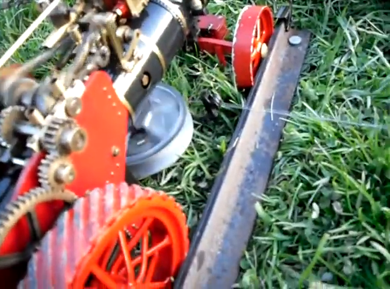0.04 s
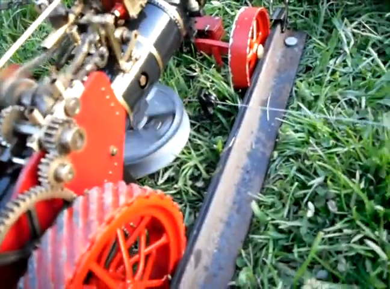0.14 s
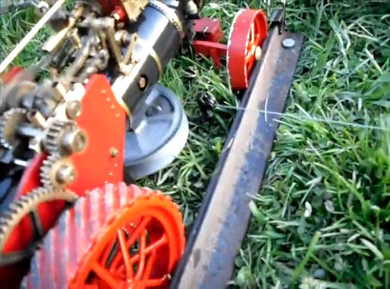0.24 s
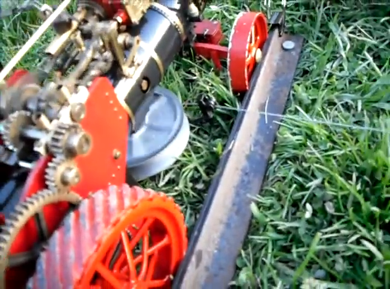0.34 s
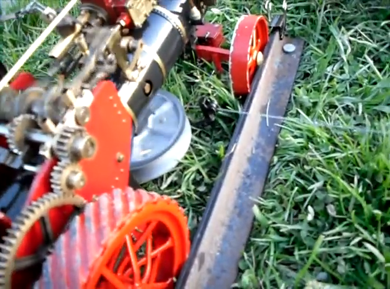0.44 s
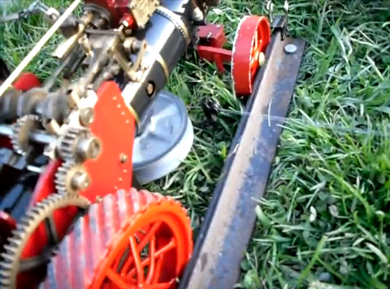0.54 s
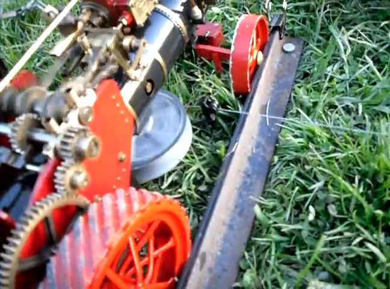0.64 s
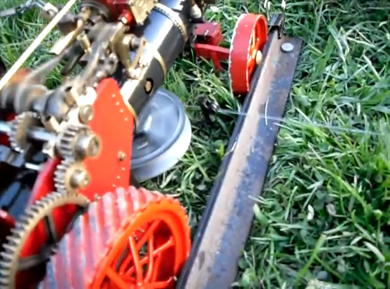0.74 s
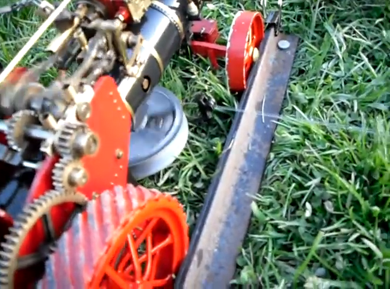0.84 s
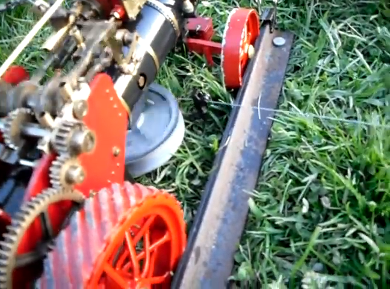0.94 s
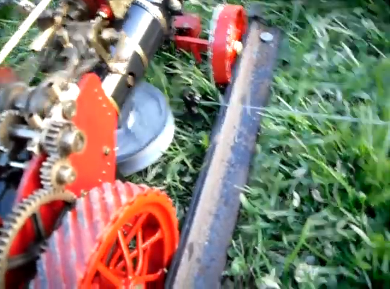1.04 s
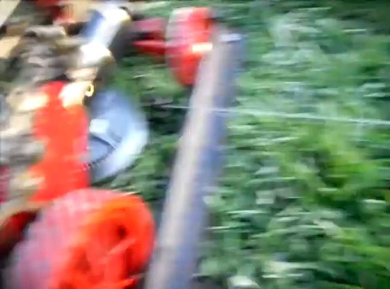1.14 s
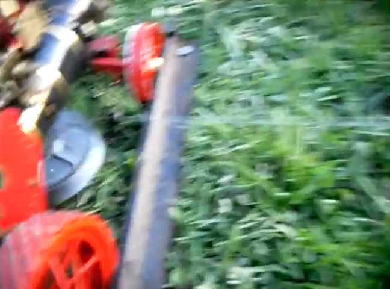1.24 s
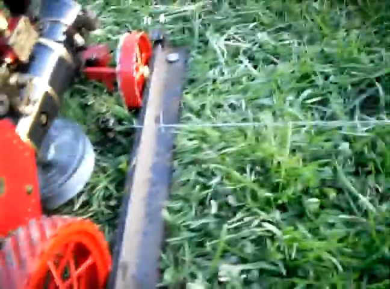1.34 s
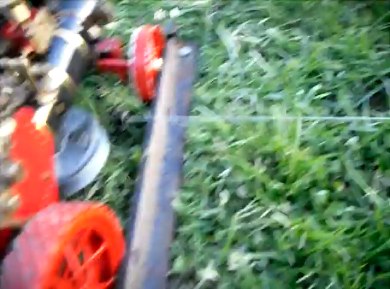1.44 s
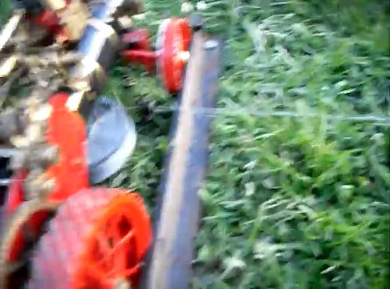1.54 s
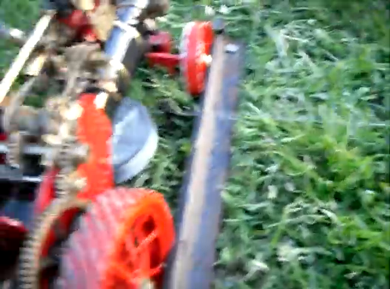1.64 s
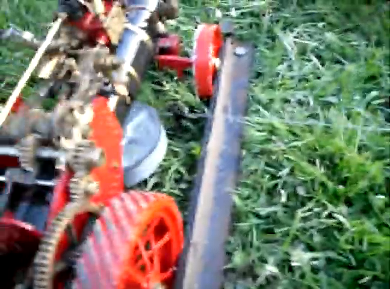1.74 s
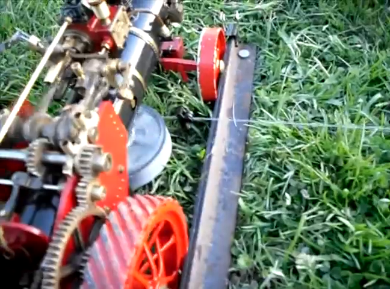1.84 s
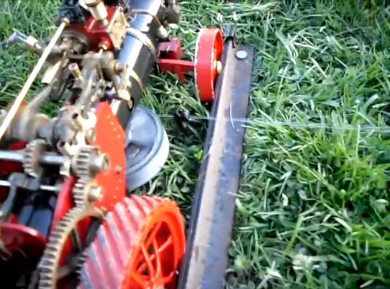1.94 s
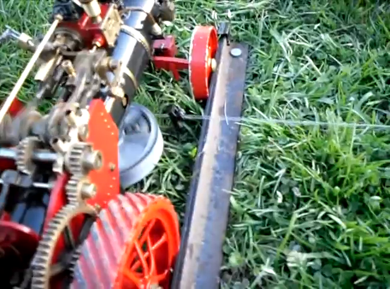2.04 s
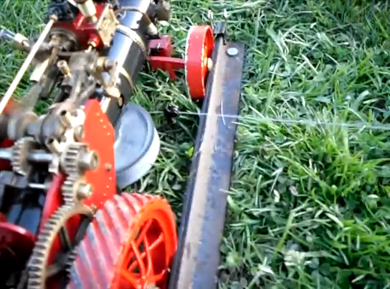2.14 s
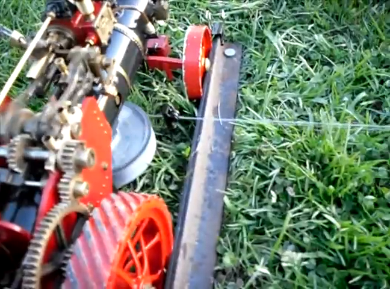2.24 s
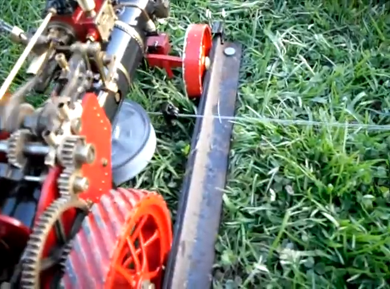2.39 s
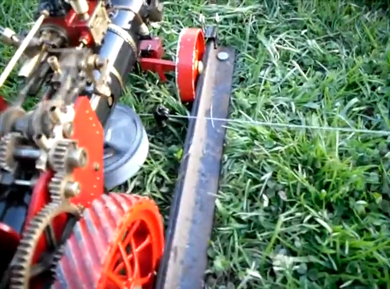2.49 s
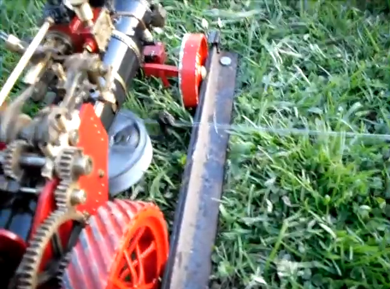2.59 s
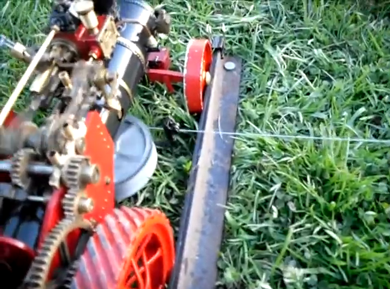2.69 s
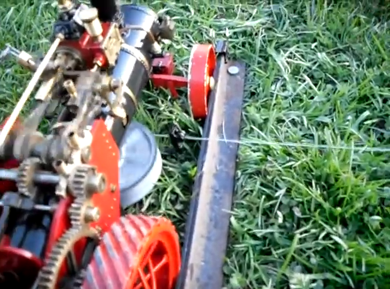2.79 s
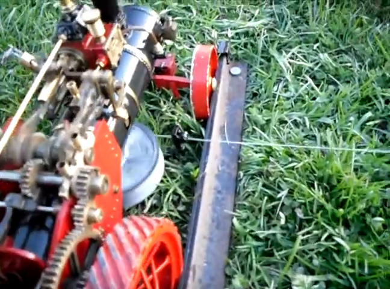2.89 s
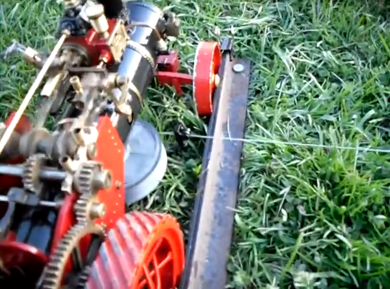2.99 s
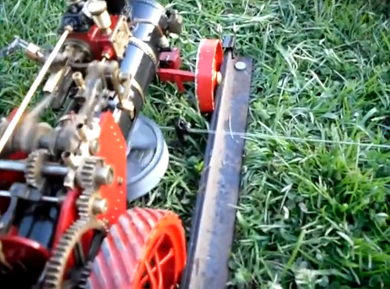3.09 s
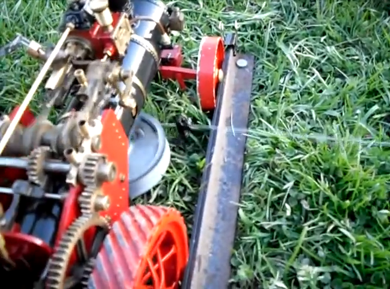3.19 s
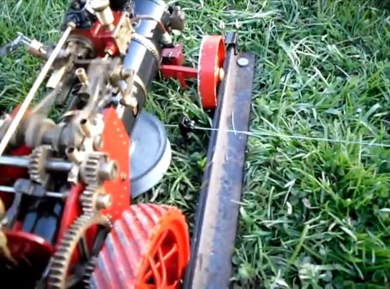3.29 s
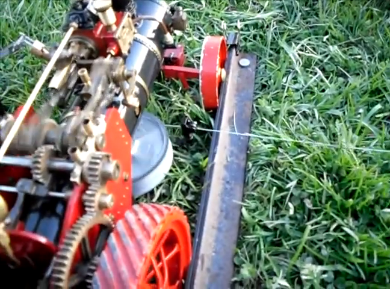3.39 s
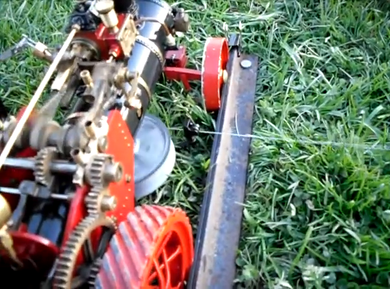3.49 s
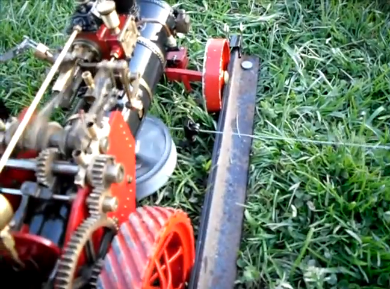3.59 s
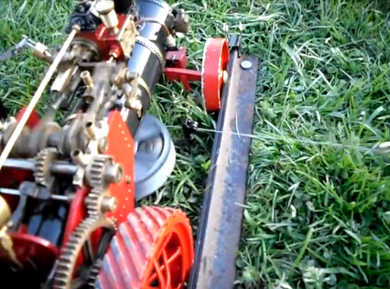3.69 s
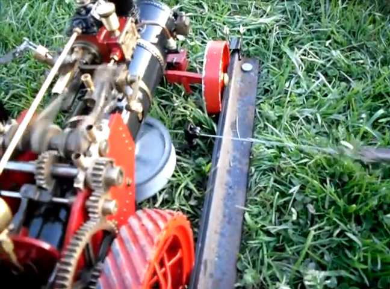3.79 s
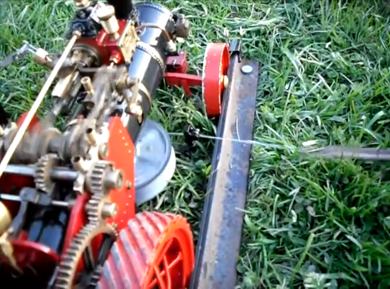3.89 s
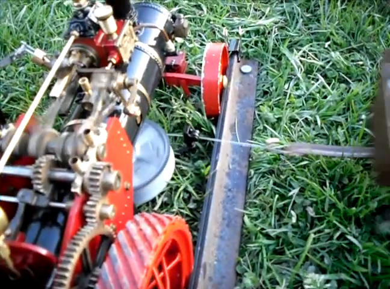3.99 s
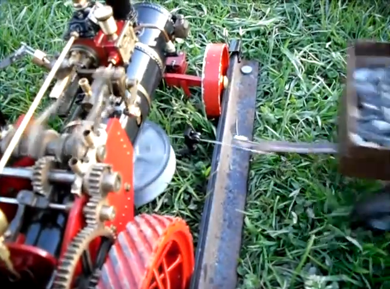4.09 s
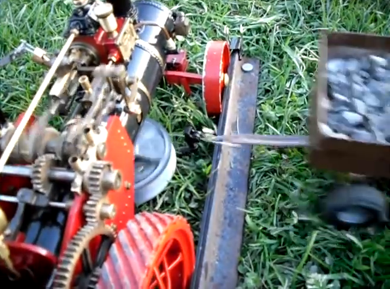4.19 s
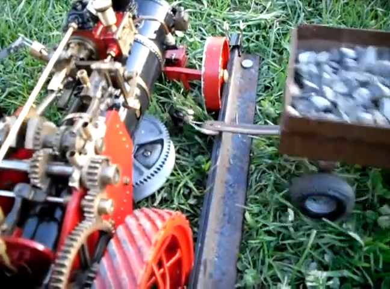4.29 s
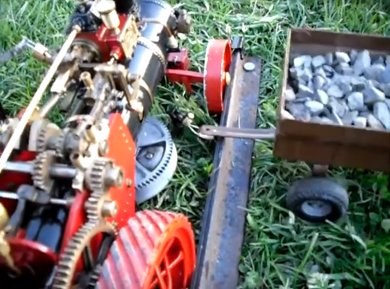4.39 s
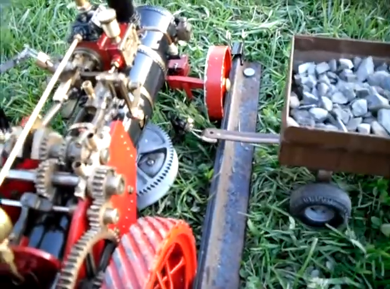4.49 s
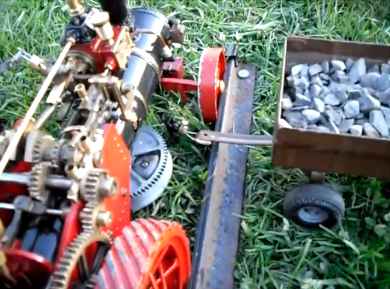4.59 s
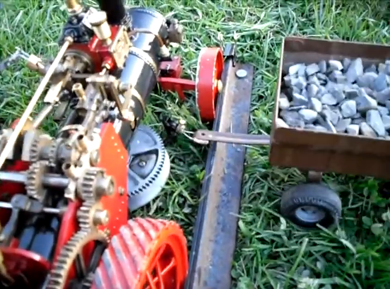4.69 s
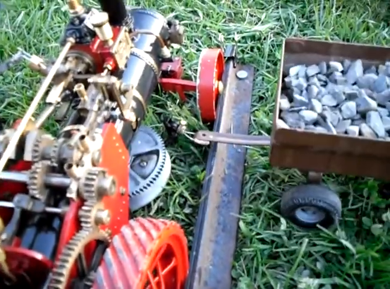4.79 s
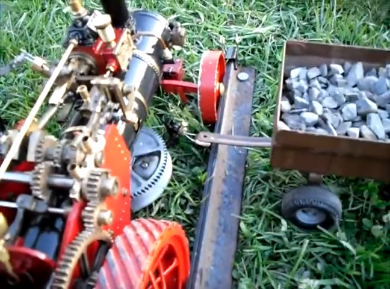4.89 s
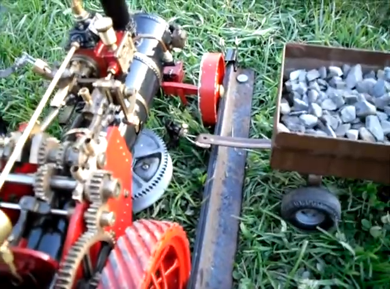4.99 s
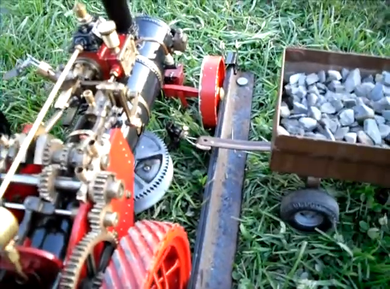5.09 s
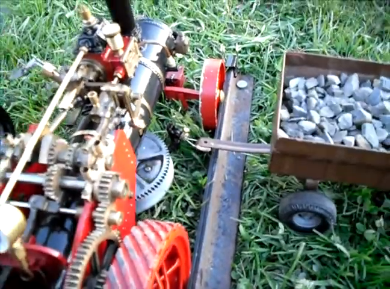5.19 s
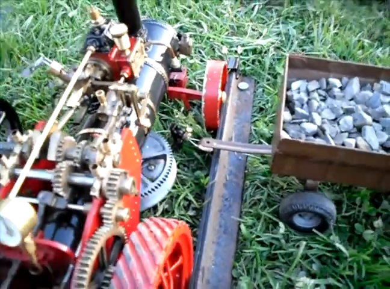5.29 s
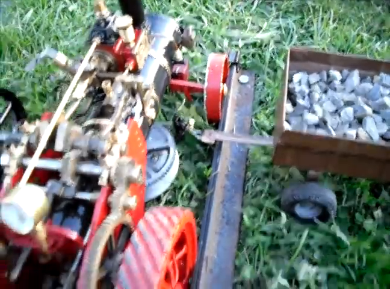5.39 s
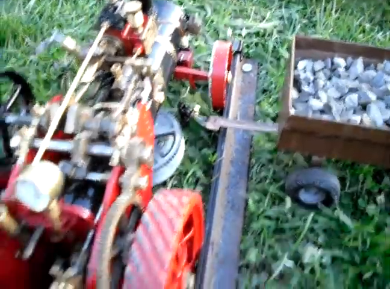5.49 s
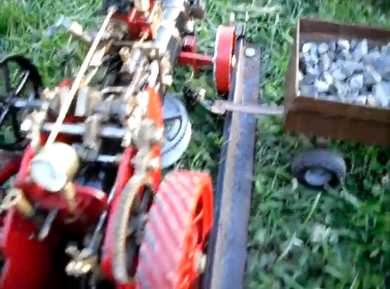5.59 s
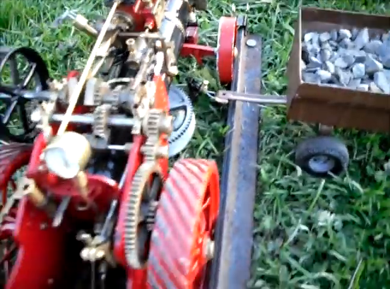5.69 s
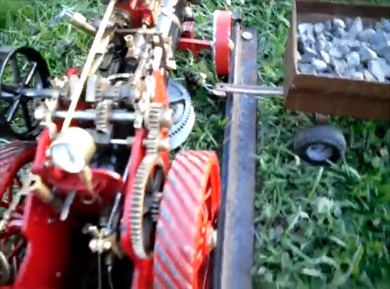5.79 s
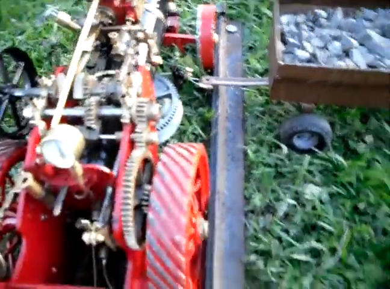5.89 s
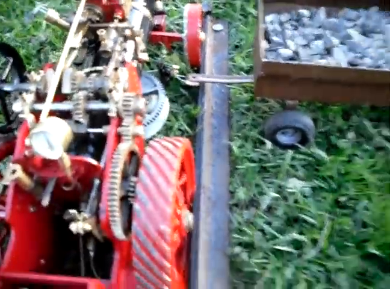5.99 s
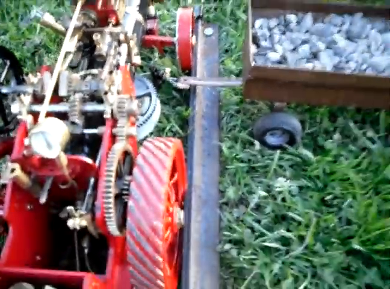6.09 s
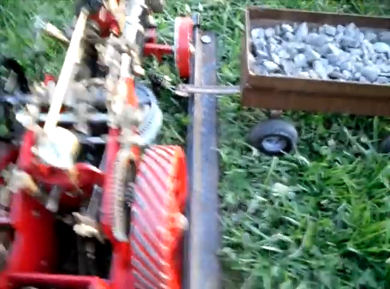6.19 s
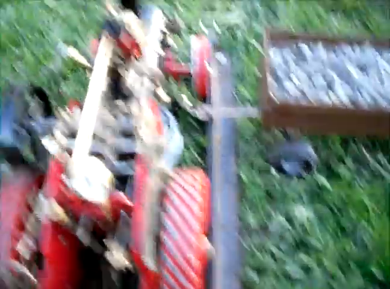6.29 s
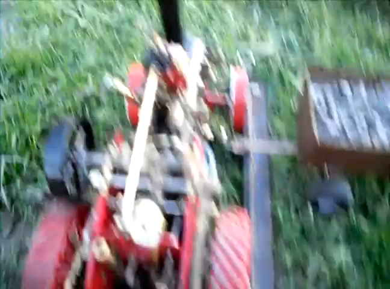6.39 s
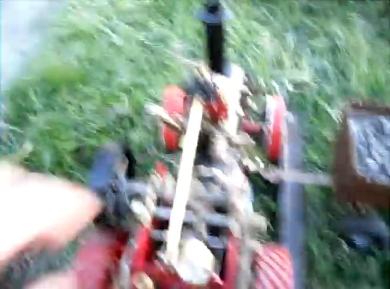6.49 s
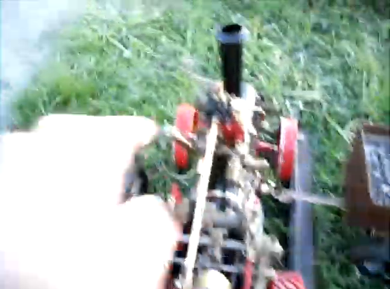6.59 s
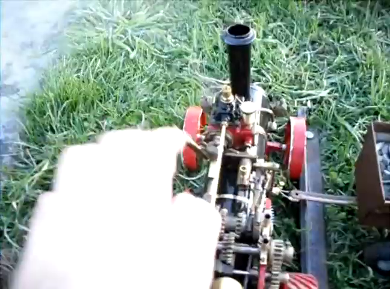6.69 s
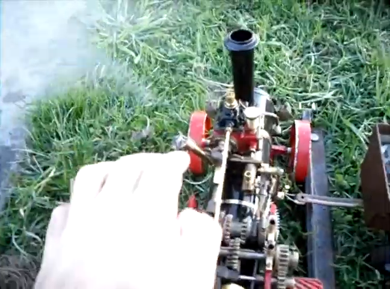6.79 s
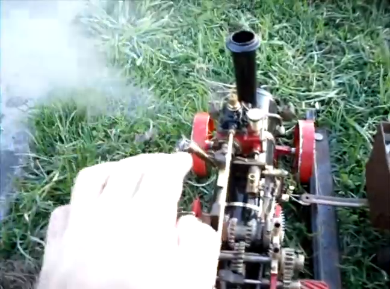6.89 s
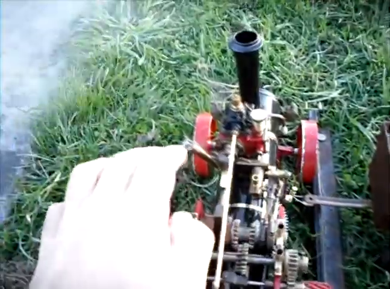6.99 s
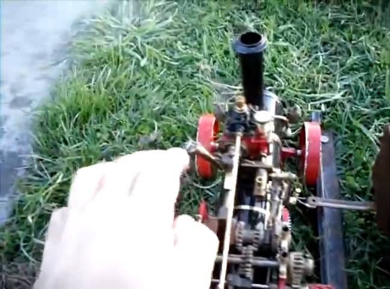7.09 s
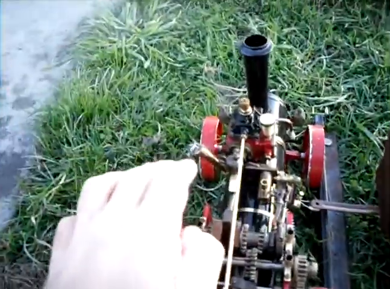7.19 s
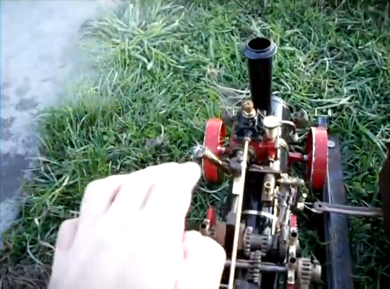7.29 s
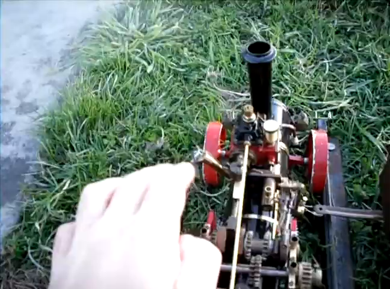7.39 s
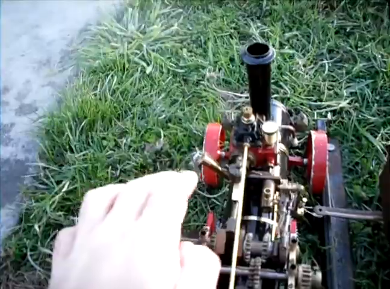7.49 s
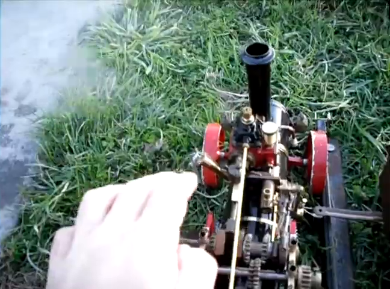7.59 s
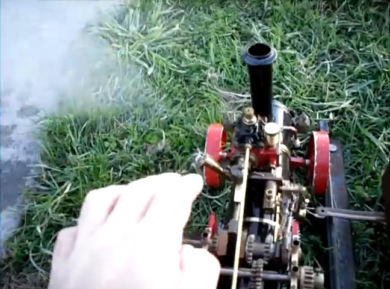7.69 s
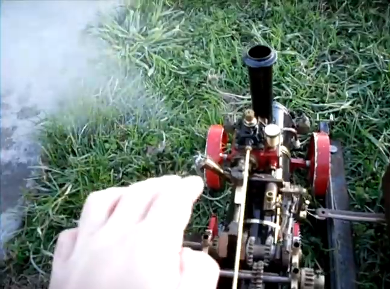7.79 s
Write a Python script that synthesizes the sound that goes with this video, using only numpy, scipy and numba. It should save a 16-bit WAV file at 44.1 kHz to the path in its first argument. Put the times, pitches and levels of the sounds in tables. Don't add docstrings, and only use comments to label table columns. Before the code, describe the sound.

Outdoors on grass, a cheap close camera microphone gives a gritty, band-limited mono sound with faint hiss, distant traffic and light breeze. From 0 to 4.1 seconds a small steam engine runs fast, around eleven to fourteen strokes a second: short hollow chuffs, two crisp valve-gear clacks per stroke and continuous tinny gear rattle. A hard watery pop bursts at 1.0. The engine stalls at about 4.1 amid a few sharp ticks; leftover steam sighs softly and a hitch jingles around 4.6. Sparse hot-metal ticks and soft low handling bumps continue until 6.4. At 6.65 a very loud, shrill whistle near 4.5 kilohertz sputters for about 0.15 seconds. A shorter, weaker, mostly hissing pull comes at 7.0 to 7.2. At 7.3 steam hisses again, then from 7.5 it shrieks in broken, spitting surges, steadying into a clipped scream from 7.7 almost to the end.

```python
import sys
import numpy as np
from scipy import signal
from scipy.io import wavfile
from scipy.ndimage import uniform_filter1d
from numba import njit

SR = 44100
rng = np.random.default_rng(int(sys.argv[2]) if len(sys.argv) > 2 else 0)


def unload_wav(signal):
    wavfile.write(
        sys.argv[1],
        SR,
        np.round(np.clip(np.atleast_2d(signal).T, -1, 1) * 32767).astype(np.int16),
    )


def gain_from_db(level_db):
    decades = np.asarray(level_db, float) / 20
    return 10 ** decades


N = 346185

# frequency in Hz, density in dB per Hz.
LAWN_SPECTRUM = [(20, -5), (70, -5), (178, -1), (550, -10), (650, -9.5), (1010, -17), (1960, -15),
                 (2720, -17.5), (3300, -18.5), (3560, -8.5), (3800, -13), (4400, -12), (5150, -12),
                 (5600, -18.5)]
LAWN_DB = -48.5
# centre in seconds, level in dB.
GUSTS = [(.2, -51.5), (.41, -48), (.98, -52), (1.47, -53.5), (2.1, -53), (4.15, -52), (5.46, -56.5),
         (5.74, -51.5), (5.97, -59), (7.27, -51)]
BREEZE_DB, GUST_S, JET_WIND_DB = -60.5, .06, -23
# start in seconds, end in seconds, first pitch in Hz,
# last pitch in Hz, level in dB.
MOAN = (.35, 0.35, 167, 124.5, -42.5)
# start in seconds, peak in dB, thump in Hz, length in seconds.
HAND_THUMPS = [(5.46, -43, 60, .05), (5.49, -47, 49.8, .04), (5.723, -45, 128.4, .07),
               (5.964, -44, 50, .05), (7.249, -36.5, 50.4, .05), (7.287, -37.5, 60.17, .05),
               (7.364, -45.5, 45.44, .06)]

# time in seconds, level in dB, third chimney mode in dB.
SIGH_LEVELS = [(0, -62.5, -3.5), (4.1, -56, -2.5), (4.3, -56, -7.5), (4.5, -55.5, -6.5),
               (4.7, -59.5, -10.5), (5.1, -63, -15.5), (5.5, -75, -13.5)]
# time in seconds, peak in dB, upper ring in Hz, lower ring in dB, lower ring in Hz.
METAL_TICKS = [(4.079, -25, 4300, -8, 2950), (4.124, -23, 5000, -8, 2540), (4.1668, -23.5, 4250, -4, 2980),
               (4.4693, -24.5, 4260, -12.5, 1584), (4.926, -24, 4190, -7, 2993),
               (5.051, -34.5, 3622, -7.5, 2950), (5.416, -20, 4360, -8, 2690),
               (5.7338, -34, 4000, -7, 1475), (5.8139, -25.5, 3530, -7.5, 2510),
               (5.9504, -22.5, 4260, -6.5, 2990), (6.0053, -37, 3610, -2, 2458),
               (6.111, -35, 3530, -7.5, 2034), (6.3852, -29.5, 4490, -3.5, 2450)]
# frequency in Hz, level in dB, 60 dB decay in seconds.
HITCH_MODES = [(661.3, -6.5, 0.041), (1630, -8.5, .015), (2610, 0, 0.014), (3200, -8, .006),
               (3650, -2, 0.018), (4260, -4, 0.013), (5000, -4.5, .01)]
# time in seconds, peak in dB.
HITCH_JINGLES = [(4.5776, -32.5), (4.5907, -27.5), (4.5964, -27), (4.618, -26), (4.6308, -24.5),
                 (4.6444, -34), (4.7651, -40.5)]

# time in seconds, exhaust strokes done.
CRANK = [(.022, 0), (.208, 2), (.558, 6), (1.031, 12), (1.315, 16), (1.466, 18), (2.052, 26), (2.187, 28),
         (2.403, 31), (2.755, 36), (2.891, 38), (3.035, 40), (3.246, 43), (3.382, 45), (3.607, 48),
         (3.886, 52), (4.044, 54), (4.143, 55)]
# frequency in Hz, width in Hz, level in dB.
FRAME_MODES = [(650.5, 200, -8.5), (1150, 600, -12), (1713, 200, -9), (2093, 100, -6.5), (2450, 280, -5),
               (2953, 440, -8.5), (3703, 300, -7.5), (4150, 400, -4.5), (5000, 720, -11)]
# time in seconds, level in dB.
RATTLE_LEVELS = [(0, -40.5), (.9, -40), (1.1, -38.5), (1.4, -40.5), (2.2, -40), (3.9, -40), (4.0, -40.5),
                 (4.14, -47.5), (4.25, -59), (4.45, -69.5), (4.7, -90.5)]
SLACK_TURN, SLACK_DB = 0.94, -4.5
# frequency in Hz, level in dB, 60 dB decay in seconds.
CHIMNEY_MODES = [(641.5, 0.5, 0.042), (168.5, -10, 0.021), (336, -7.5, 0.011), (486, -9.5, 0.0099),
                 (1805, -20, .02)]
# frequency in Hz, level in dB, 60 dB decay in seconds.
FIRST_CLACK = [(2486, -5, 0.0082), (3140, -8.5, 0.0045), (3700, -4, .007), (4250, 0.5, .009),
               (5000, -2.5, 0.0066)]
# frequency in Hz, level in dB, 60 dB decay in seconds.
SECOND_CLACK = [(1770, -8.5, 0.016), (2504, -6, 0.011), (3173, -10, 0.0063), (4150, -3, .008),
                (4824, 1.5, .007), (5230, -3, .006)]
# frequency in Hz, level in dB, 60 dB decay in seconds.
WATER_POP_MODES = [(330, -14, .012), (660, -7, .032), (1150, -1, .008), (1400, -1, .008), (1700, -2, .011),
                   (2500, 0, .013), (3100, -3, .007), (4300, -2.5, .009)]
# time in seconds, peak in dB.
WATER_POPS = [
    (.9862, -3.4),
    (1.0166, -16.5),
    (2.141, -23),
]
FIRST_TURN, SECOND_TURN, SETTLE_TURN, TURN_JITTER = .4, .595, .645, .008
CHUFF_DB, FIRST_DB, SECOND_DB, SETTLE_DB = 15.5, 17.5, 15.5, 11
CHUFF_SPREAD_DB, CLACK_SPREAD_DB = 1, 1.1
LOOSE_S, LOOSE_SPAN_S, LOOSE_DB = 1.3, .4, 1.5

# frequency in Hz, density in dB per Hz.
JET_SPECTRUM = [(880, -48), (1500, -19), (2210, -20.5), (2270, -18.5), (2710, -15), (3600, 1), (3930, -4),
                (4750, -1.5), (5500, -16), (7150, -46.5), (12100, -120)]
# start in seconds, length in ms, peak in dB.
SURGES = [(6.6452, 4.6, -3), (6.654, 4, -9), (6.687, 4.76, -13), (6.701, 6, -7.5), (6.71, 5.15, -8),
          (6.72, 6, -9), (6.736, 4.43, -10), (6.741, 18.8, -1.5), (6.759, 9.9, -11.5), (7.126, 6.9, -16),
          (7.134, 13.9, -8), (7.149, 4, -10), (7.159, 8.1, -10), (7.505, 11.86, -3), (7.524, 5.04, -4),
          (7.532, 5.93, -4), (7.54, 3.9, -1), (7.554, 3.85, -7), (7.562, 9, -9), (7.576, 3, -4),
          (7.585, 16, -2.5), (7.617, 5.5, -3), (7.628, 4, -6), (7.643, 6, -2.5), (7.652, 8.3, -2.5),
          (7.664, 27, -3), (7.694, 7.64, -2), (7.703, 3.7, -7.5), (7.711, 126, 1.34), (7.837, 13, -4)]
# time in seconds, peak in dB.
SPITS = [
    (6.719, -12),
    (7.535, 0),
    (7.612, -7),
    (7.72, 1),
]
OPEN_S, CLOSE_S, SHUT_DB = .009, .028, -95
# time in seconds, pitch in Hz, breathy tone in dB, jet hiss in dB.
FIRST_PULL = [(6.639, 4207, -39.5, -46), (6.645, 4280, -21, -31), (6.665, 4627, -19, -28),
              (6.74, 4535, -17.5, -27.5), (6.76, 4218, -21, -31), (6.776, 4067, -29.5, -35),
              (6.8, 4000, -59, -56)]
# time in seconds, pitch in Hz, breathy tone in dB, jet hiss in dB.
SECOND_PULL = [(7.02, 3998, -68.5, -53), (7.028, 4000, -59.5, -31.5), (7.105, 3800, -52.5, -31),
               (7.125, 4003, -28, -29.5), (7.145, 4178, -20, -31.5), (7.17, 4150, -26, -31.5),
               (7.185, 4150, -42, -30.5), (7.205, 4150, -63, -58.5)]
# time in seconds, pitch in Hz, breathy tone in dB, jet hiss in dB.
LONG_HISS = [(7.314, 3700, -69.5, -49), (7.322, 3700, -51.5, -34), (7.345, 3700, -43.5, -28.5),
             (7.4, 3700, -43.5, -31), (7.46, 3872, -35.5, -29), (7.485, 4250, -19.5, -27.5)]
# time in seconds, pitch in Hz, breathy tone in dB, jet hiss in dB.
LONG_BLAST = [(7.51, 4504, -18, -28), (7.56, 4655, -17, -29), (7.6, 4547, -17.5, -28),
              (7.7, 4506, -15.5, -29), (7.72, 4448, -19.5, -19.5), (7.76, 4396, -19, -21.5),
              (7.81, 4390, -21.5, -22), (7.83, 4302, -20.5, -22), (7.85, 4037, -19.5, -26.5)]

STEP_MOVES = np.array([-1, -1, -1, -1, 2, 4, 6, 8])
FULL_SCALE, HEADROOM_DB = .725, 1


def evened(x):
    return x / np.sqrt(np.mean(x ** 2) + 1e-20)


def curve(rows):
    s, *columns = np.transpose(rows)
    return [np.interp(np.arange(N) / SR, s, c) for c in columns]


def coloured(points, patchy_db):
    frames, hz = N // 128 + 5, np.fft.rfftfreq(512, 1 / SR)
    real, imaginary, patches = rng.standard_normal((frames, 257, 3)).T
    patches = uniform_filter1d(patches, size=5, axis=0)
    patches = evened(uniform_filter1d(patches, size=16, axis=1))
    f, level_db = np.transpose(points)
    shape_db = np.interp(np.log(hz + 1), np.log(f), level_db, right=-90)
    z = (real + 1j * imaginary) * gain_from_db(shape_db[:, None] + patchy_db * patches)
    return evened(signal.istft(z, nperseg=512, noverlap=384)[1][:N])


def peak(x, hz, width):
    return evened(signal.lfilter(*signal.iirpeak(hz, hz / width, SR), x))


def resonate(x, hz, width):
    turn = np.exp(2j * np.pi * np.cumsum(hz * np.ones(len(x))) / SR)
    r = np.exp(-np.pi * width / SR)
    return 2 * (turn * signal.lfilter([1 - r], [1, -r], x / turn)).real


def ring(modes, detune=0.98, rise_ms=.01):
    t = np.arange(2600) / SR
    out = sum(gain_from_db(db - 60 * t / t60) * np.sin(2 * np.pi * hz * detune * t) for hz, db, t60 in modes)
    out = out * np.minimum(t * 1000 / rise_ms, 1) ** 2
    return out / abs(out).max()


def add(mix, s, sound):
    part = mix[round(s * SR):][:len(sound)]
    part += sound[:len(part)]


def clack(modes, noise, spread_ms):
    t = np.arange(len(noise)) / SR * 1000 - 4
    knocks = noise * np.exp(np.where(t > 0, -t / spread_ms, 2 * t))
    knocks[np.argmax(t > 0)] += 4.5
    out = np.convolve(knocks, ring(modes, rise_ms=0.5))
    return 5.3 * out / (np.linalg.norm(out) + 1e-12)


def valve():
    rows = []
    for pull in (FIRST_PULL, SECOND_PULL, LONG_HISS + LONG_BLAST):
        first, last = pull[0], pull[-1]
        rows.append((first[0] - OPEN_S, first[1], SHUT_DB, SHUT_DB))
        rows += pull
        rows.append((last[0] + CLOSE_S, last[1], SHUT_DB, SHUT_DB))
    return curve(rows)


def lawn():
    band = signal.butter(2, [36, 260], "band", fs=SR, output="sos")
    lumps = evened(signal.sosfilt(band, rng.standard_normal(N)))
    t = np.arange(N) / SR
    breeze = gain_from_db(BREEZE_DB + 2.2 * (t < CRANK[-1][0]))
    breeze = breeze + gain_from_db(valve()[1] + JET_WIND_DB - 10.5)
    breeze = breeze + sum(gain_from_db(db) * np.exp(-((t - s) / GUST_S) ** 2) for s, db in GUSTS)
    out = gain_from_db(LAWN_DB - 3.4) * coloured(LAWN_SPECTRUM, patchy_db=1.5) + breeze * lumps
    start, end, from_hz, to_hz, db = MOAN
    count = round((end - start) * SR)
    phase = 2 * np.pi * np.cumsum(np.linspace(from_hz, to_hz, count)) / SR
    add(out, start, gain_from_db(db) * np.hanning(count) * np.sin(phase))
    return out


def handling():
    out = np.zeros(N)
    for s, db, hz, length in HAND_THUMPS:
        t = np.arange(0, length, 1 / SR)
        add(out, s, gain_from_db(db) * np.hanning(len(t)) * np.sin(2 * np.pi * hz * t))
    return out


def sigh():
    steam = rng.standard_normal(N)
    level_db, third_db = curve(SIGH_LEVELS)
    lowest = peak(peak(steam, 660, 90), 660, 200)
    third = peak(peak(steam, 2050, 45), 2050, 200)
    return gain_from_db(level_db) * (lowest + gain_from_db(third_db) * third)


def ticks():
    out = np.zeros(N)
    snaps = rng.standard_normal((len(METAL_TICKS), 90))
    for (s, db, upper_hz, lower_db, lower_hz), snap in zip(METAL_TICKS, snaps):
        add(out, s - .0003, gain_from_db(db - 6) * np.diff(snap) * np.exp(-np.arange(89) / 30))
        modes = [(upper_hz, 0, .007), (upper_hz * 0.79, -6, .006),
                 (lower_hz, lower_db, .009), (lower_hz * .6, lower_db - 4, .006)]
        add(out, s - .0006, gain_from_db(db - 1.04) * ring(modes, rise_ms=.9))
    for s, db in HITCH_JINGLES:
        add(out, s - .004, gain_from_db(db - 2.0) * clack(HITCH_MODES, rng.standard_normal(500), 1.1))
    return out


def gears():
    force = gain_from_db(.7 * np.minimum(rng.exponential(1, N), 5))
    contact = rng.random(N) < 6000 / SR
    teeth = rng.standard_normal(N) * force * contact
    turn = np.interp(np.arange(N) / SR, *np.transpose(CRANK))
    load_db = SLACK_DB * np.exp(3.0 * (np.cos(2 * np.pi * (turn - SLACK_TURN)) - 1))
    body = sum(gain_from_db(db) * peak(gain_from_db(load_db) * teeth, hz, width) for hz, width, db in FRAME_MODES)
    gland = peak(rng.standard_normal(N), 4100, 300)
    rattle = evened(body + gain_from_db(-13.5) * evened(teeth) + gain_from_db(-6.5) * gland)
    return gain_from_db(curve(RATTLE_LEVELS)[0] + 0.58) * rattle


def engine():
    out, puff = np.zeros(N), np.zeros(N)
    crank_s, done = np.transpose(CRANK)
    last = int(done[-1])
    # turn, level in dB, modes, spread in ms, extra dB under load
    knocks = [(FIRST_TURN, FIRST_DB, FIRST_CLACK, 3.4, 0),
              (SECOND_TURN, SECOND_DB, SECOND_CLACK[2:], 2.8, LOOSE_DB),
              (SETTLE_TURN, SETTLE_DB, SECOND_CLACK[:2], 2.2, LOOSE_DB)]
    steam_db = curve(RATTLE_LEVELS)[0]
    mouth = signal.butter(3, 950, fs=SR, output="sos")
    for stroke in range(last + 1):
        s = np.interp(stroke, done, crank_s)
        pitch_luck, level_luck = rng.standard_normal(2)
        db = steam_db[round(s * SR)] + CHUFF_DB + CHUFF_SPREAD_DB * level_luck
        pop = ring(CHIMNEY_MODES, 1.03 + .008 * pitch_luck)
        add(out, s, gain_from_db(db + 0.5) * signal.sosfilt(mouth, pop))
        add(puff, s, gain_from_db(db - 60 * np.arange(8000) / SR / 0.13))
        if stroke == last:
            continue
        for turn, above_db, modes, spread_ms, loose_db in knocks:
            noise = rng.standard_normal(500)
            at = np.interp(stroke + turn + TURN_JITTER * noise[0], done, crank_s)
            knock_db = steam_db[round(at * SR)] + above_db + CLACK_SPREAD_DB * noise[1]
            knock_db += loose_db * np.exp(-((at - LOOSE_S) / LOOSE_SPAN_S) ** 2)
            add(out, at - .004, gain_from_db(knock_db) * clack(modes, noise, spread_ms))
    breath = peak(peak(rng.standard_normal(N), 665, 110), 665, 220)
    for s, db in WATER_POPS:
        add(out, s, gain_from_db(db) * ring(WATER_POP_MODES, rise_ms=1.5))
    bass_cut = signal.butter(2, 90, "high", fs=SR, output="sos")
    return signal.sosfilt(bass_cut, out + gain_from_db(-19) * puff * breath)


def whistle():
    hz, tone_db, jet_db = valve()
    speaking = np.zeros(N)
    for s, ms, db in SURGES:
        count = round(ms * SR / 1000) + 90
        add(speaking, s - .001, gain_from_db(db) * signal.windows.tukey(count, min(180 / count, 1)))
    wobble, flutter = (evened(uniform_filter1d(uniform_filter1d(v, size=60), size=60))
                       for v in rng.standard_normal((2, N)))
    pitch = hz + 50 / (1 + 3.5 * speaking ** 2) * wobble
    clean = speaking * (1 + 0.087 * flutter) * np.sin(2 * np.pi * np.cumsum(pitch) / SR)
    breathy = gain_from_db(tone_db) * evened(resonate(resonate(rng.standard_normal(N), hz, 240), hz, 2200))
    dry = clean + breathy + gain_from_db(jet_db) * coloured(JET_SPECTRUM, patchy_db=1.5)
    for s, db in SPITS:
        add(dry, s - .001, gain_from_db(db - 2.5) * rng.standard_normal(80) * np.hanning(80))
    t = np.arange(9000) / SR
    yard = rng.standard_normal(9000) * gain_from_db(-61 - 60 * t / 0.25)
    yard[0], yard[3000] = 1, gain_from_db(-41)
    return signal.oaconvolve(dry, yard)[:N]


def scene():
    return (lawn() + handling() + sigh() + ticks() + gears() + engine() + whistle())[None]


@njit
def four_bit(x, moves):
    out, held, index = np.zeros(len(x)), 0., 0
    for n in range(len(x)):
        step = 7 * 1.1 ** index / 32768
        code = min(int(abs(x[n] - held) / step * 4), 7)
        held = min(max(held + np.sign(x[n] - held) * (code + .5) * step / 4, -1.), 1.)
        index = min(max(index + moves[code], 0), 88)
        out[n] = held
    return out


def top_cut(x):
    return signal.sosfilt(signal.butter(12, 15770, fs=SR, output="sos"), x)


def record(dry):
    guard = signal.firwin(129, 6000, window=("kaiser", 6), fs=SR)
    slow = signal.resample_poly(dry[0], 1, 4, window=guard)
    top = FULL_SCALE * gain_from_db(HEADROOM_DB)
    rounded = slow / top / (1 + abs(slow / top) ** 12) ** (1 / 12)
    stepped = top * four_bit(rounded, STEP_MOVES)
    smooth = signal.firwin(121, 5512, window=("kaiser", 9), fs=SR)
    fast = signal.resample_poly(stepped, 4, 1, window=smooth)[:N]
    return top_cut(np.clip(fast, -FULL_SCALE, FULL_SCALE)[None])


dry = scene()
out = record(dry)
unload_wav(out)
```